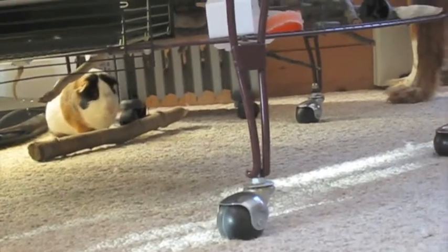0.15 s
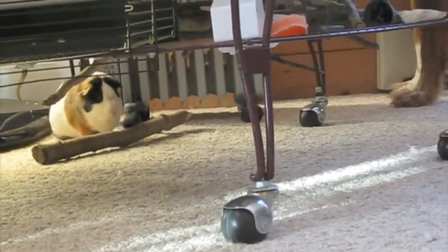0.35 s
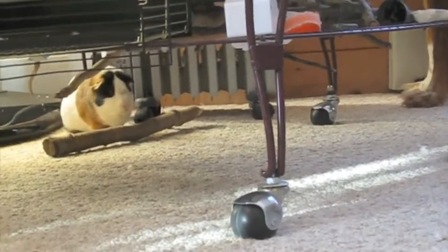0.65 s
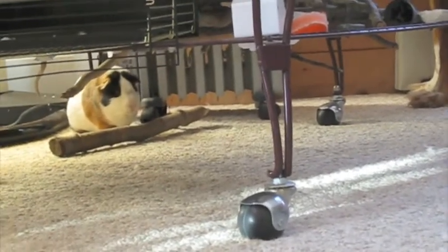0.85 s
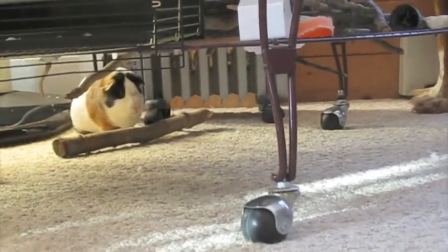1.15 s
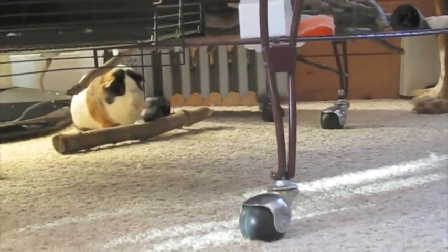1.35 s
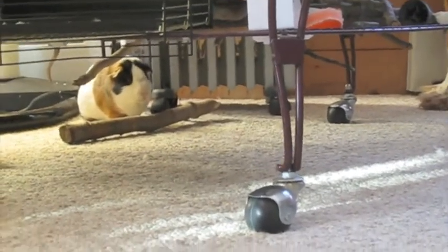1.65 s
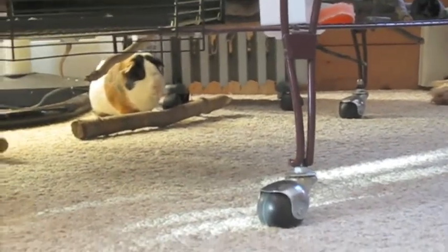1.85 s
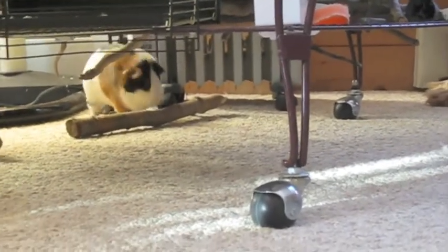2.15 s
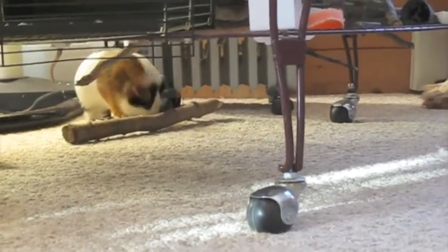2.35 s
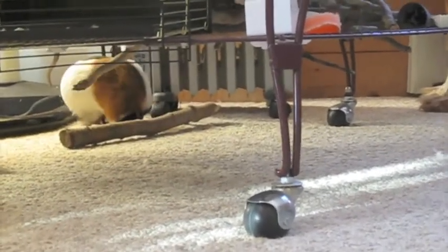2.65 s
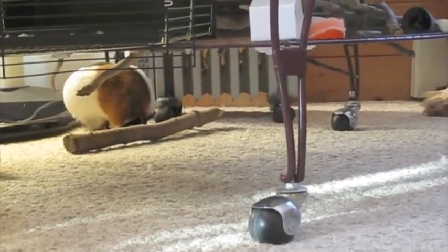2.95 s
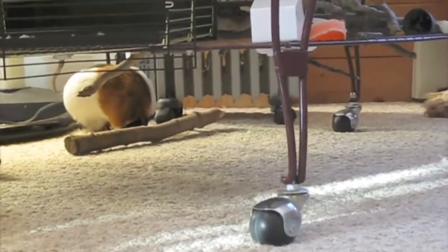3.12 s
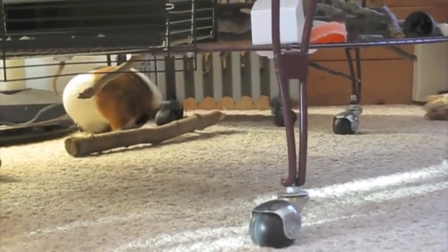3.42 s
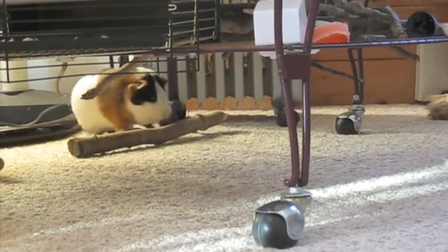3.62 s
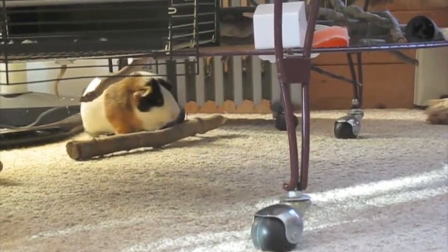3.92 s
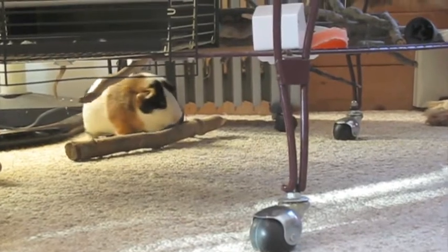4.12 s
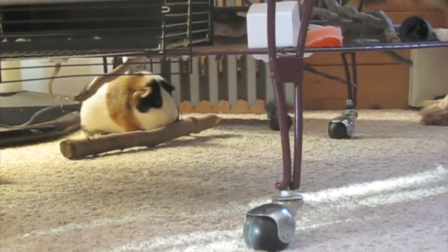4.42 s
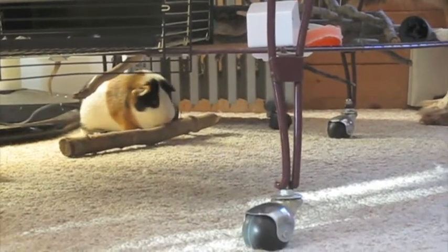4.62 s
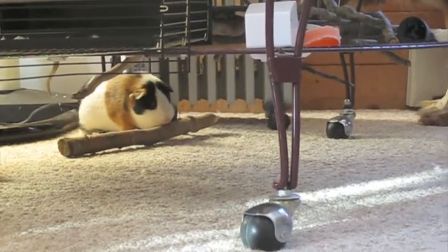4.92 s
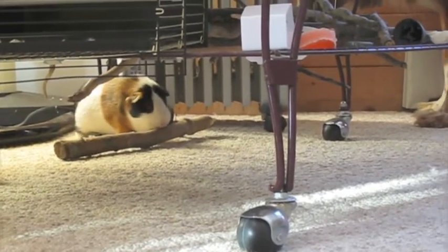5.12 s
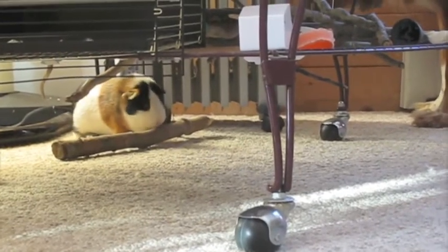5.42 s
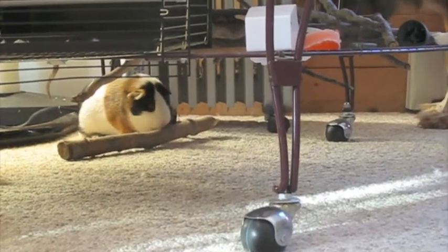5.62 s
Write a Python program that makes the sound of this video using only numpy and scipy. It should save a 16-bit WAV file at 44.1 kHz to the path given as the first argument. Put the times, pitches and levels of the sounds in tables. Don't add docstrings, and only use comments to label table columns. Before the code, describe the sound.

A guinea pig gives short clusters of high squeaks, cracking whistles and hoarse little screams in a softly echoing room, over steady faint hiss.

```python
import sys
import numpy as np
from scipy import signal
from scipy.fft import rfft, irfft, next_fast_len
from scipy.io import wavfile
from scipy.ndimage import uniform_filter1d

SR = 44100
rng = np.random.default_rng(int(sys.argv[2]) if len(sys.argv) > 2 else 0)


def generate_wav(sig):
    pcm = np.round(np.clip(np.atleast_2d(sig).T, -1, 1) * 32767).astype(np.int16)
    wavfile.write(sys.argv[1], SR, pcm)


def magnitude_from_level(level_db):
    exponent = np.asarray(level_db, float) / 20
    return 10 ** exponent


N = 254456


def evened(x):
    return x / np.sqrt(np.mean(abs(x) ** 2) + 1e-20)


def read(points, hz):
    f, value = np.transpose(points)
    return np.interp(np.log(hz + 1), np.log(f + 1), value)


def coloured(x, points):
    size = next_fast_len(N)
    gain = magnitude_from_level(read(points, np.fft.rfftfreq(size, 1 / SR)))
    return irfft(rfft(x, size) * gain, size)[:N]


def noise(points):
    return evened(coloured(rng.standard_normal(N), points))


def smooth(x, s):
    size = max(round(s * SR / 2), 1)
    return uniform_filter1d(uniform_filter1d(x, size), size)


def wander(hz):
    return evened(smooth(rng.standard_normal(N), 1 / hz))


def chaos(hz):
    lowpass = signal.butter(4, hz, fs=SR, output="sos")
    return evened(signal.sosfilt(lowpass, rng.standard_normal((2, N))))


def partial(turn, rough, smear):
    spread = smear[0] * np.cos(turn) + smear[1] * np.sin(turn)
    return np.sqrt(2 * (1 - rough)) * np.cos(turn) + np.sqrt(rough) * spread


def voice():
    # f/Hz, level/dB
    mouth = [(1500, -28), (2200, 7.5), (3200, 4), (4200, 1), (5500, -11), (7000, -6.5), (9000, -11),
             (11000, -10), (13000, -16), (15500, -33)]
    hz, first, over, rough = controls()
    waver = 0.006 * np.sqrt(hz / 400) * wander(200)
    jitter = 0.042 * rough * wander(480)
    turn = 2 * np.pi * np.cumsum(hz * (1 + waver + jitter)) / SR
    flutter = magnitude_from_level((1.1 + 4.21 * rough) * wander(395))
    steady = np.sqrt(1 - rough ** 2)
    smear = steady * chaos(660) + rough * chaos(2000)
    uneven_db = 2.5 * wander(50)

    overtones, power = np.zeros(N), 1e-9
    for k in range(2, 11):
        slope_db = 5.4 * k * np.log2(hz / 900) * (1 - 0.37 * rough)
        weight = magnitude_from_level(read(mouth, k * hz) - slope_db + np.roll(uneven_db, k * N // 11))
        weight = weight * np.clip((15900 - k * hz) / 300, 0, 1)
        blur = np.clip(rough + (0.53 + 1.1 * rough) * (k * hz / 16000) ** 2, 0, 1)
        overtones += weight * partial(k * turn, blur, np.roll(smear, k * 97, axis=1))
        power = power + weight ** 2
    overtones = over * overtones / np.sqrt(power + 1e-6)

    rasp = noise([(3500, -30), (6500, -3), (9000, -3), (15900, -18)])
    rasp *= magnitude_from_level(6.5) * np.sqrt(rough) * over ** 3 / (over ** 2 + magnitude_from_level(-58))
    first_smear = steady * chaos(550) + rough * chaos(1230)
    return flutter * (first * partial(turn, rough, first_smear) + overtones + rasp)


def controls():
    # t/s, gain/dB, width/s
    surges = [(0.473, -6, 0.0013), (0.4764, 14, 0.0015), (0.4795, -4, .001), (0.5191, 11.5, 0.00077),
              (0.5196, -10, 0.00093), (0.5275, -1, .001), (0.5305, 4, .001), (0.534, 2, .001),
              (0.709, -2.5, .0015), (0.7382, -2, 0.0021), (0.809, -11, 0.0035), (1.613, -7, .002),
              (3.483, -2, 0.0014), (3.792, -8, 0.0016), (1.816, -1, 0.0021), (0.718, 2.5, 0.0011),
              (0.7484, 3.5, 0.00092), (3.4867, 2.5, 0.0015), (3.796, 11, .002), (4.029, -0.5, 0.0027),
              (4.155, -2, 0.0015), (4.59, 4.5, .0017), (4.4155, -1, 0.00097), (4.502, -5, .001),
              (2.45, -8, .001), (2.4605, -8, 0.0014), (2.465, -6, .001), (2.518, -8, .001),
              (2.519, 4, .001), (4.679, -18, .001), (.745, -2, .001), (3.543, -4, .001), (5.632, 8, .001),
              (5.635, -8, .0015), (5.6428, -6, 0.00072), (5.65, 3, 0.001), (5.6519, -6, 0.00055),
              (5.66, 6.5, 0.0019), (5.665, -6, .001), (5.704, 6.5, 0.0011), (5.7065, -5, .0008),
              (5.7105, -3, 0.00078)]
    # t/s, gain/dB, width/s
    openings = [(.256, 5.5, 0.019), (.452, 1, .008), (.47, 7.5, 0.0048), (.483, -17, 0.0058),
                (.495, 7, .006), (.53, -7.5, 0.014), (.545, 6, 0.0044), (.564, -7, 0.0055),
                (.462, -9, .003), (3.11, 0, 0.0092), (3.165, 5, 0.011), (3.19, 2, .008), (4.255, 4, .01),
                (4.36, 5.5, .006), (.75, 4.5, 0.0067), (.785, 1.5, 0.0071), (1.49, 6, 0.012),
                (1.598, 13.5, 0.0043), (1.65, -2, .01), (2.415, -5, .02), (2.455, -1, 0.0083),
                (2.483, -9, 0.0067), (2.515, 4, 0.0045), (3.47, -4, 0.0074), (3.481, 16, 0.0044),
                (3.492, -10, 0.0028), (3.514, 5, 0.0048), (3.528, 14, 0.0043), (3.72, -3, .012),
                (3.772, -10, .015), (3.796, 5, .006), (3.96, -7, 0.014), (4.003, 12.5, 0.0065),
                (4.03, 5, 0.0048), (4.048, 10, 0.0029), (4.038, 4, 0.0037), (4.812, -7, 0.0086),
                (4.06, -3, 0.0042), (4.288, -13, 0.0085), (4.312, 4, 0.0097), (4.499, -4, 0.0071),
                (4.61, -4, .02), (4.71, -5, 0.011), (4.76, -13, .015), (4.79, -3, 0.012),
                (5.356, 10.5, 0.0095), (5.424, 13.5, 0.0058), (5.57, 3.5, 0.0086), (5.592, -17, 0.011),
                (5.609, -8, 0.006), (5.627, 18, 0.0039), (5.646, 1, 0.0047), (5.68, 4.5, 0.014),
                (5.703, 7, 0.0094)]
    attack_s, release_s = 0.00061, 0.0018
    tie_s = 0.0013
    overtones_follow = 0.61
    overtones_db, overtones_db_per_octave = 2.5, -13.0
    falsetto_octave, falsetto_db_per_octave = 1.55, -22.0
    slack_octaves, slack_s, slack_rough = 0.9, 0.051, 0.82
    slip_octaves_per_s, slip_db, slip_bright_db = 44, -1, -4
    crack_s, crack_rough, crack_bright_db = 0.0038, 0.36, 2.5

    t = np.arange(N) / SR
    first, over, rough = np.zeros((3, N))
    line = []
    surge_db = sum(db * np.exp(-((t - s) / width_s) ** 2) for s, db, width_s in surges)
    open_db = sum(db * np.exp(-((t - s) / width_s) ** 2) for s, db, width_s in openings)
    kinds = call_kinds()
    starts, ends = np.transpose([(call[0][0], call[-1][0]) for calls, *_ in kinds for call in calls])
    for calls, base_rough, bright_db in kinds:
        for call in calls:
            s, hz, db, *strain = np.transpose(call)
            s = np.maximum.accumulate(s)
            line += zip(s, np.log2(hz))
            fresh = not any(abs(s[0] - ends) < tie_s)
            following = starts[abs(starts - s[-1]) < tie_s]
            tied = len(following)
            end_s = following[0] if tied else s[-1]
            at = np.arange(round(s[0] * SR), round(end_s * SR))
            octave = np.interp(t[at], s, np.log2(hz / 1000))
            level_db = np.interp(t[at], s, db)

            fall = np.clip(2 * (octave.max() - octave - slack_octaves), 0, 1)
            slack = (not tied) * np.exp((t[at] - s[-1]) / slack_s) * fall
            slip = np.tanh((np.gradient(octave) * SR / slip_octaves_per_s) ** 2)
            crack = fresh * np.exp((s[0] - t[at]) / crack_s)
            rise = (t[at] - s[0]) / attack_s + (not fresh)
            release = (s[-1] - t[at]) / release_s + 2 * tied
            gain = np.clip(np.minimum(rise, release), 0, 1) * magnitude_from_level(level_db + slip_db * slip)

            tone_db = overtones_db + overtones_db_per_octave * octave + bright_db + open_db[at]
            if not strain:
                tone_db = tone_db + falsetto_db_per_octave * np.maximum(octave - falsetto_octave, 0)
            tone_db = tone_db + crack_bright_db * crack + slip_bright_db * np.sqrt(slip)
            tone_db = tone_db + (overtones_follow - 1) * (level_db - level_db.mean())
            first[at] += gain
            over[at] += gain * magnitude_from_level(tone_db)
            rough[at] = base_rough + crack_rough * crack + slack_rough * slack
            if strain:
                rough[at] += np.interp(t[at], s, strain[0])

    hz = 2 ** np.interp(t, *np.transpose(sorted(line)))
    glide_s = 0.0014
    push = magnitude_from_level(surge_db)
    rough = np.clip(smooth(rough, glide_s), 0.01, 1)
    return smooth(hz, glide_s), smooth(first, 0.0022) * push, smooth(over, 0.0061) * push, rough


def call_kinds():
    # start t/s, length/s, from f/Hz, to f/Hz, level/dB
    peeps = [
        (0.967, 0.025, 1086, 1104, -44.5),
        (1.97, 0.029, 1307, 1490, -49.5),
        (2.044, 0.012, 1696, 1720, -55),
        (2.114, 0.013, 1834, 1844, -51.5),
        (2.188, 0.009, 1670, 1687, -48.5),
        (4.179, 0.03, 2200, 2010, -44),
        (4.492, 0.01237, 3230, 2120, -30.5),
        (4.803, .017, 2063, 2420, -35),
        (5.417, 0.012, 1876, 1993, -44.5),
    ]
    # start t/s, length/s, from f/Hz, to f/Hz, level/dB
    chuts = [
        (1.141, 0.011, 2535, 2750, -47.5),
        (1.806, 0.021, 1890, 1208, -39.5),
        (4.153, 0.011, 2833, 2505, -40),
    ]
    # t/s, pitch f/Hz, level/dB
    chirps = [
        [(.251, 933, -49), (.258, 1010, -46), (.292, 1128, -46), (.298, 1380, -42.5), (.336, 1455, -44.5),
         (.345, 1533, -60), (.355, 1387, -37.5), (.362, 1510, -58), (.388, 1447, -65)],
        [(1.481, 1284, -39.5), (1.506, 1038, -50.5), (1.512, 1007, -48.5), (1.535, 1170, -49),
         (1.548, 1453, -46.5), (1.582, 1168, -52)],
        [(2.335, 1661, -36.5), (2.349, 1181, -61), (2.37, 1030, -51), (2.382, 1162, -47), (2.386, 1355, -41),
         (2.402, 1648, -43.5), (2.432, 1713, -47)],
        [(3.098, 994, -46.5), (3.146, 1137, -52), (3.152, 1292, -50), (3.17, 1103, -47), (3.188, 1463, -41),
         (3.205, 1170, -58), (3.222, 1216, -46), (3.252, 1620, -52), (3.269, 1538, -49)],
        [(5.339, 1093, -47), (5.349, 1100, -43), (5.355, 1364, -43.5), (5.364, 1410, -64)],
    ]
    # t/s, pitch f/Hz, level/dB
    run_ups = [
        [(3.704, 1950, -58), (3.712, 2105, -41.5), (3.729, 2087, -42), (3.731, 1260, -47), (3.755, 2040, -51)],
        [(3.934, 2270, -47), (3.949, 1920, -36), (3.958, 1873, -38.5), (3.969, 1720, -35.5), (3.976, 1253, -41),
         (3.983, 1538, -40)],
        [(5.5, 1568, -42), (5.509, 1580, -53), (5.512, 1210, -46), (5.535, 1053, -54), (5.56, 1533, -48),
         (5.564, 1656, -33.5), (5.572, 1808, -38), (5.599, 2010, -42)],
    ]
    # t/s, pitch f/Hz, level/dB
    whistles = [
        [(1.591, 3153, -34), (1.595, 3280, -34.5), (1.606, 3783, -41.5), (1.614, 3763, -48),
         (1.6155, 3070, -30), (1.621, 2350, -37), (1.632, 1950, -42)],
        [(1.633, 2740, -42), (1.64, 2655, -39), (1.647, 2438, -44), (1.661, 1897, -46)],
        [(2.446, 2860, -40), (2.454, 3023, -37.5), (2.458, 3237, -36), (2.464, 3450, -41), (2.466, 2826, -32),
         (2.469, 2438, -38.5), (2.478, 2566, -32.5), (2.492, 2560, -28), (2.496, 2573, -27)],
        [(2.497, 2950, -39), (2.503, 3080, -27), (2.506, 2875, -34), (2.511, 2770, -26), (2.521, 2656, -34.5),
         (2.525, 1386, -36), (2.535, 1302, -50), (2.554, 1000, -71)],
        [(3.431, 2150, -46), (3.439, 2300, -34), (3.445, 2964, -29.5), (3.459, 2806, -35), (3.462, 3784, -32),
         (3.472, 3500, -35.5), (3.478, 3206, -38), (3.485, 2990, -35)],
        [(3.4855, 2975, -27), (3.493, 2725, -29.5), (3.496, 2824, -30), (3.502, 2657, -29), (3.511, 2215, -38),
         (3.515, 1920, -31)],
        [(3.516, 2340, -44), (3.5225, 2466, -28), (3.5245, 3324, -30), (3.532, 3360, -33), (3.535, 3155, -33),
         (3.539, 3283, -33), (3.546, 2920, -33), (3.548, 1768, -38.5), (3.56, 1636, -61)],
        [(4.721, 2004, -35), (4.725, 2623, -29), (4.73, 3100, -31.5), (4.74, 2500, -37), (4.747, 3080, -38),
         (4.764, 2784, -36.5), (4.771, 2950, -39), (4.782, 1950, -40), (4.795, 1886, -46)],
    ]
    # t/s, pitch f/Hz, level/dB
    warbles = [
        [(4.25, 1200, -50), (4.277, 1640, -46), (4.279, 2400, -31), (4.283, 3150, -36), (4.29, 3068, -44),
         (4.293, 2850, -35.5), (4.3, 2698, -31), (4.302, 2134, -39.5), (4.326, 2052, -38.5)],
        [(4.327, 1401, -52), (4.348, 1900, -50), (4.354, 1784, -43), (4.359, 1800, -35), (4.364, 1383, -36.5),
         (4.37, 1148, -44), (4.384, 1122, -46)],
        [(4.385, 1885, -44), (4.395, 1992, -42), (4.397, 2240, -38), (4.404, 2400, -33), (4.408, 2780, -26.5),
         (4.413, 2550, -38), (4.417, 2815, -32), (4.425, 2720, -56)],
        [(4.544, 3295, -46), (4.553, 3150, -33), (4.556, 3200, -50), (4.558, 3920, -42), (4.563, 4375, -40.5),
         (4.571, 4070, -37), (4.584, 3300, -45), (4.591, 2800, -28.5), (4.595, 2400, -29)],
        [(4.596, 2430, -35), (4.605, 2805, -29), (4.611, 2394, -35), (4.62, 2630, -41), (4.63, 2250, -38),
         (4.641, 1866, -45), (4.651, 1640, -34.5), (4.656, 1902, -37.5)],
        [(4.657, 2590, -33), (4.66, 3400, -42), (4.669, 3500, -54), (4.671, 3900, -37), (4.682, 3684, -37),
         (4.697, 3600, -51), (4.699, 2800, -48), (4.704, 2373, -36), (4.717, 2300, -49)],
    ]
    # t/s, pitch f/Hz, level/dB
    cries = [
        [(.442, 3795, -35), (.447, 3522, -26), (.458, 3722, -27.5), (.467, 2690, -18.5), (.474, 2620, -27.5),
         (.478, 2950, -20.5), (.487, 2807, -20), (.49, 2394, -22), (.498, 2313, -24)],
        [(.499, 2492, -23), (.516, 2636, -15.5), (.522, 3540, -20), (.527, 3524, -19), (.5315, 2897, -21),
         (.542, 2705, -24), (.548, 2040, -29.5), (.555, 1397, -40.5), (.568, 1057, -41.5)],
        [(3.988, 3770, -39), (3.996, 3410, -36), (4.008, 3383, -29), (4.013, 3064, -26), (4.017, 2485, -28),
         (4.025, 2700, -28), (4.03, 2700, -15.5), (4.036, 2700, -24)],
        [(4.038, 2755, -37), (4.043, 2797, -14), (4.044, 3617, -18.5), (4.0495, 3484, -21.5),
         (4.051, 2984, -22), (4.061, 2870, -24.5), (4.066, 2340, -38.5), (4.09, 1022, -54)],
        [(5.603, 2830, -42), (5.609, 3036, -28.5), (5.617, 3140, -38)],
        [(5.62, 4400, -25), (5.627, 4424, -28.5), (5.633, 3625, -27.5), (5.636, 3643, -25),
         (5.641, 3764, -18.5), (5.646, 3060, -16), (5.654, 2638, -22), (5.669, 2507, -24), (5.684, 2230, -23)],
    ]
    # t/s, pitch f/Hz, level/dB, strain 0-1
    scream = [
        [(.697, 3020, -34.5, 0.52), (.708, 3628, -18, 0.63), (.72, 3650, -28.5, 0.9), (.724, 3960, -29, 0.4),
         (.739, 3945, -33, 0.24)],
        [(.74, 3694, -20, 0.35), (.745, 3270, -19, 0.2), (.753, 3050, -25, 0.1), (.759, 3020, -26, 0.47),
         (.763, 2540, -28.5, 0.45), (.77, 2556, -32.5, 0.2)],
        [(.7705, 2725, -28, 0.28), (.783, 3200, -27.5, 0.5), (.7925, 3394, -24, 0.35), (.7935, 4375, -26, 0.32),
         (.804, 4352, -28.5, 0.6), (.815, 3860, -26, 0.94)],
    ]
    # t/s, pitch f/Hz, level/dB, strain 0-1
    yelps = [
        [(3.756, 3376, -47, 0.08), (3.772, 3210, -40, 0), (3.786, 3086, -41, 0), (3.788, 4193, -30, 0.22),
         (3.793, 3890, -35, 0.1), (3.798, 3880, -37.5, 0.05), (3.803, 3830, -39, 0.41), (3.81, 3298, -31, 0.86),
         (3.824, 3100, -36.5, 0.77)],
        [(5.685, 2960, -18.5, 0.29), (5.694, 3905, -23, 0.45), (5.702, 3538, -27, 0), (5.705, 4094, -24, 0.51),
         (5.709, 3544, -26, 0.55), (5.714, 3200, -23.5, 0.5), (5.718, 2910, -25, 0.33),
         (5.729, 1730, -46, 0.76)],
    ]

    def glides(table):
        return [[(s, from_hz, db), (s + length_s, to_hz, db)] for s, length_s, from_hz, to_hz, db in table]

    return [(glides(peeps), 0.1, 0.48), (glides(chuts), 0.92, 1.7), (chirps, 0.052, 1),
            (run_ups, 0.06, 4.3), (whistles, 0.02, 1.2), (warbles, 0.06, 0.71),
            (cries, 0.0053, 2.55), (scream, 0.01, 15.6), (yelps, 0.0066, 2.55)]


def strands():
    glides = [(0.435, 0.0087, 2650, 2130, -36.5), (0.443, 0.019, 2040, 1685, -41),
              (0.486, 0.028, 5230, 3630, -42), (3.8, 0.0065, 2700, 2380, -35),
              (3.957, .018, 2590, 3493, -49), (4.8, 0.0087, 1527, 2123, -45),
              (0.487, .012, 5500, 4520, -44), (0.71, 0.0063, 5600, 5464, -25.5),
              (3.708, 0.021, 5244, 5220, -60), (3.709, 0.017, 6330, 6300, -61),
              (3.787, 0.0091, 3094, 3000, -43), (2.542, 0.013, 1085, 947, -51.5),
              (4.476, 0.0062, 2920, 2950, -54), (3.752, 0.023, 2051, 2755, -54),
              (3.798, 0.011, 1385, 1220, -45), (4.065, 0.01726, 1860, 855, -48.5),
              (4.473, 0.013, 1273, 1347, -55), (4.808, 0.024, 3160, 2457, -68),
              (5.62, 0.0077, 2076, 2238, -34.5), (5.674, 0.025, 4640, 4246, -38),
              (5.689, 0.015, 5000, 3890, -33), (5.716, 0.0169, 2160, 1276, -45.5)]
    out, waver = np.zeros(N), 0.025 * wander(300)
    for s, length_s, from_hz, to_hz, db in glides:
        at = round(s * SR) + np.arange(round(length_s * SR))
        hz = np.geomspace(from_hz, to_hz, len(at)) * (1 + waver[at])
        turn = 2 * np.pi * np.cumsum(hz) / SR
        tone = np.sin(turn) + 0.1 * np.sin(2 * turn)
        out[at] += magnitude_from_level(db + 7.5) * tone * signal.windows.tukey(len(at), 0.6)
    return out


def room(x):
    # f/Hz, t60/s
    decay = [(800, 0.61), (2000, 0.36), (3500, 0.3), (6000, 0.29), (8000, 0.28)]
    # delay t/s, level/dB
    echoes = [(.0021, -21), (.0047, -9), (.0078, -14), (0.0112, -16), (0.0167, -16)]
    taps = np.zeros(SR // 2)
    at = np.arange(180, len(taps) - 20, 20)
    taps[at + rng.integers(0, 20, len(at))] = rng.choice([-1., 1.], len(at))
    hz, t, z = signal.stft(taps, SR, nperseg=256)
    fade = magnitude_from_level(-60 * t / read(decay, hz)[:, None])
    tail = signal.istft(z * fade, SR, nperseg=256)[1]
    tail *= magnitude_from_level(-10.5) / np.linalg.norm(tail)
    for s, db in echoes:
        tail[round(s * SR)] += magnitude_from_level(db)
    return signal.fftconvolve(x, tail)[:N]


def ticks():
    # t/s, peak level/dB, wide part level/dB
    events = [(1.389, -56, -12), (1.417, -45, -2), (1.976, -53, 0), (2.487, -58, -10), (3.15, -50, -3),
              (3.201, -57, -12), (3.521, -52, -12), (4.097, -58, -6), (4.419, -50, -16), (4.499, -58, 3),
              (4.776, -58, 10)]
    t60_s, attack_s = 0.039, 0.00099
    t, out = np.arange(N) / SR, np.zeros(N)
    top = noise([(11000, -40), (13000, -9), (14500, 0), (15900, -2)])
    wide = noise([(3000, -30), (6000, 1), (10000, 10), (15900, -9)])
    for s, db, wide_db in events:
        shape = magnitude_from_level(db - 60 * np.maximum(t - s, 0) / t60_s) * np.clip((t - s) / attack_s, 0, 1)
        out += shape * (top + magnitude_from_level(wide_db) * wide)
    return out


def background():
    # f/Hz, level/dB per Hz
    hiss_colour = [(25, -15), (85, -10.5), (119, -5.5), (240, -7), (465, -8.5), (800, -8), (1500, -9.5),
                   (2150, -8.5), (2700, -11.5), (4000, -16), (5500, -18.5), (7000, -22.5), (8000, -52),
                   (8600, -69)]
    # f/Hz, level/dB
    hum_lines = [(118.4, -77), (333.8, -74.5)]
    t = np.arange(N) / SR
    out = magnitude_from_level(-52.5 + 0.12 * wander(29)) * noise(hiss_colour)
    for hz, db in hum_lines:
        level = magnitude_from_level(db + 6.5 + 4.3 * wander(8.7))
        out += level * np.sin(2 * np.pi * hz * t + 0.41 * wander(6.1))
    return out


def scene():
    # f/Hz, level/dB
    radiation = [(500, -51), (800, -1), (1000, -0.5)]
    animal = magnitude_from_level(-2) * coloured(voice() + strands(), radiation)
    return (animal + room(animal) + background() + ticks())[None]


def band_limit(x):
    return signal.sosfilt(signal.butter(12, 15830, fs=SR, output="sos"), x)


def record(dry):
    # f/Hz, level/dB per Hz
    treble = [(6000, -27), (7500, -3), (8600, 2.5), (9700, 2), (13400, -8.5), (15200, -11.5), (15800, -20)]
    # f/Hz, level/dB
    notch = [(6500, 0.5), (7300, -3.5), (7700, -12.5), (7950, -30), (8150, -14.5), (8600, -10.5),
             (15850, 3.5), (16050, -40)]
    hiss = magnitude_from_level(-60.5) * noise(treble)
    mix = coloured(dry[0] + hiss, notch)[None]
    return band_limit(mix)


dry = scene()
out = record(dry)
generate_wav(out)
```